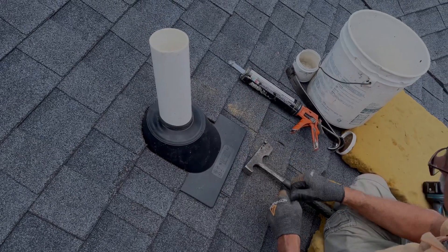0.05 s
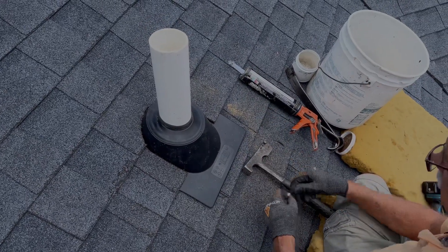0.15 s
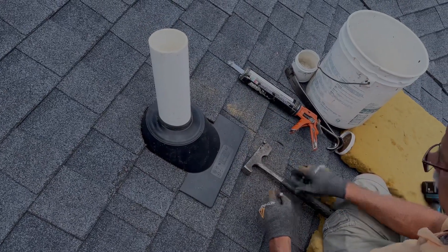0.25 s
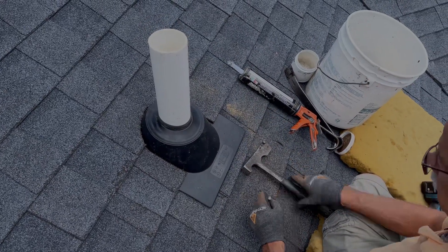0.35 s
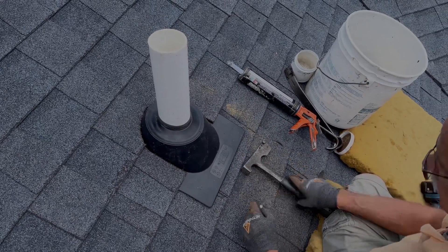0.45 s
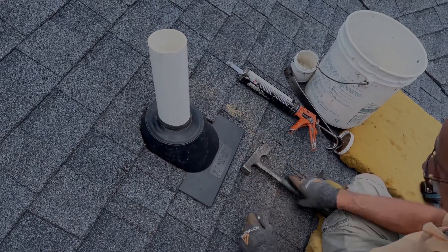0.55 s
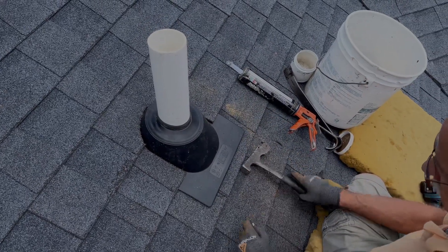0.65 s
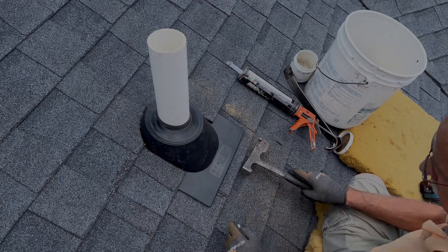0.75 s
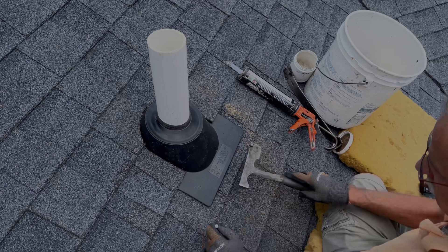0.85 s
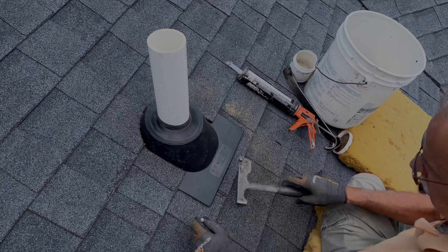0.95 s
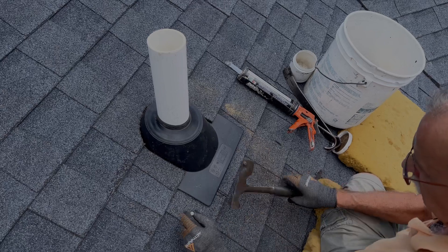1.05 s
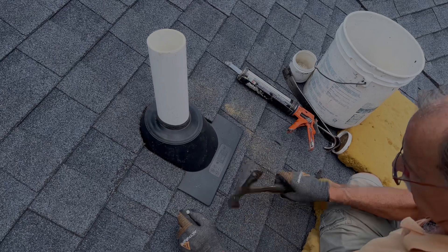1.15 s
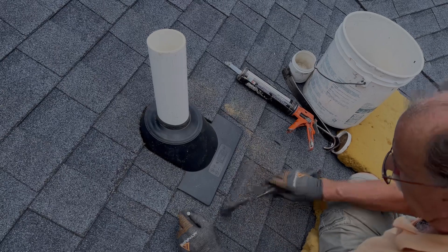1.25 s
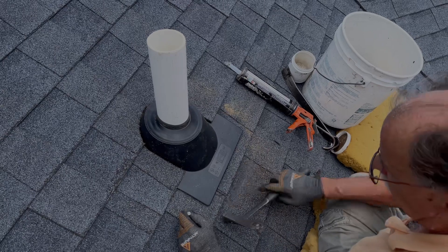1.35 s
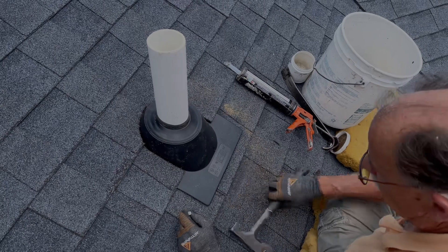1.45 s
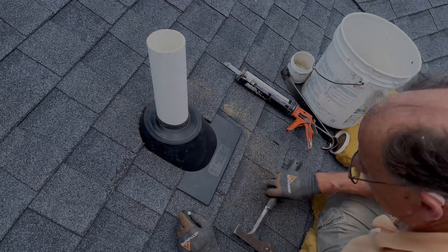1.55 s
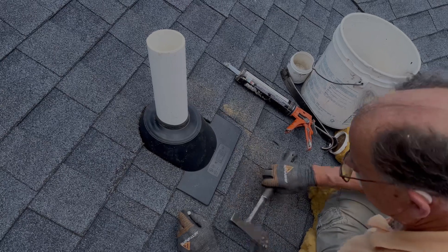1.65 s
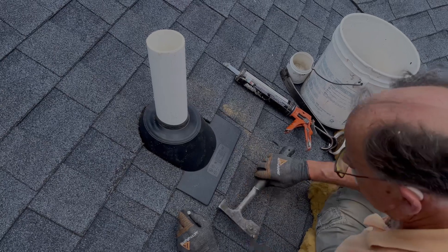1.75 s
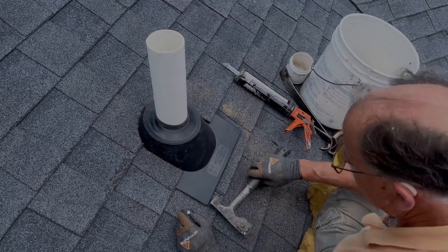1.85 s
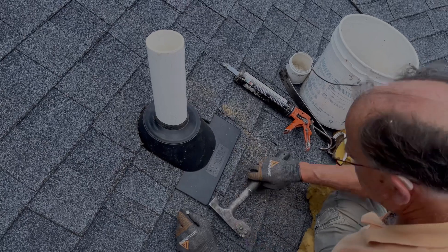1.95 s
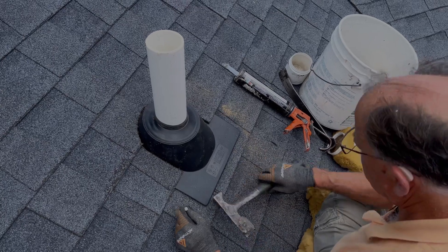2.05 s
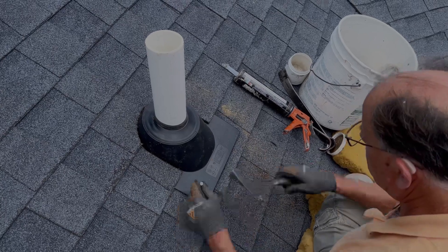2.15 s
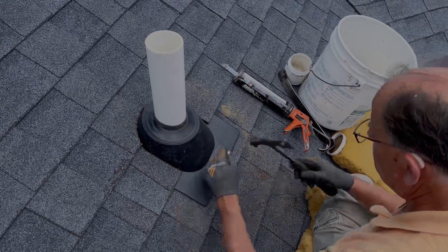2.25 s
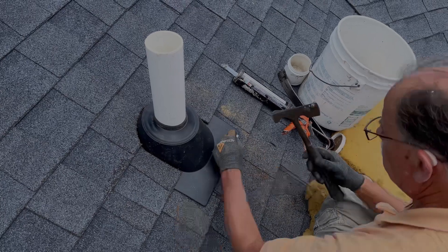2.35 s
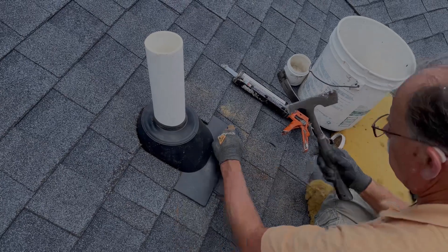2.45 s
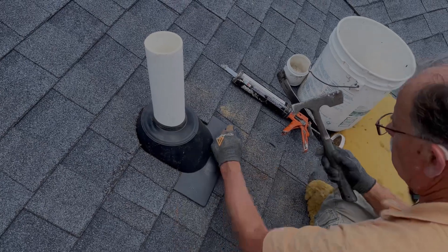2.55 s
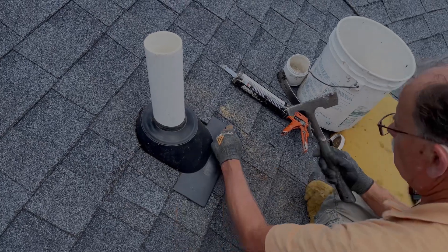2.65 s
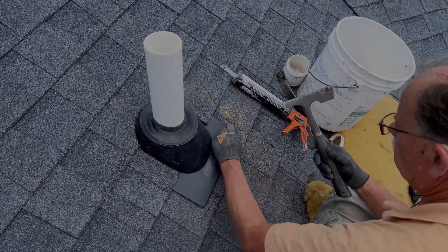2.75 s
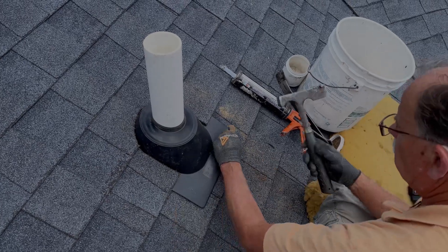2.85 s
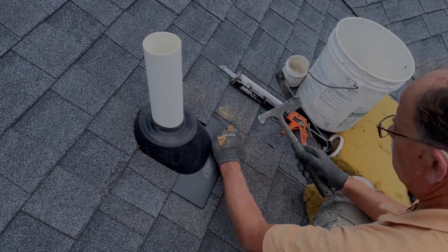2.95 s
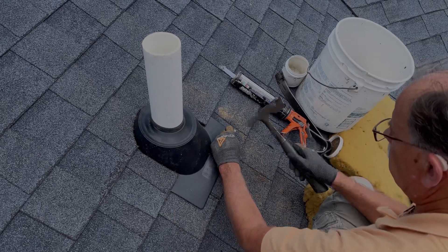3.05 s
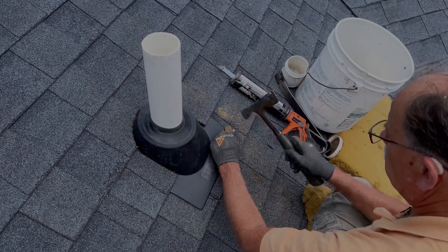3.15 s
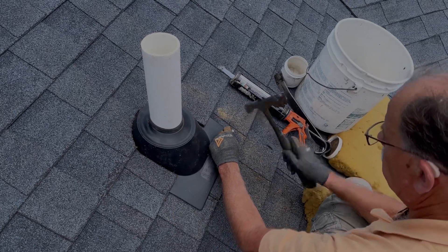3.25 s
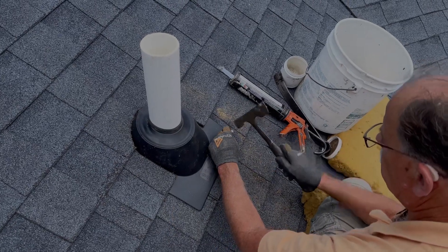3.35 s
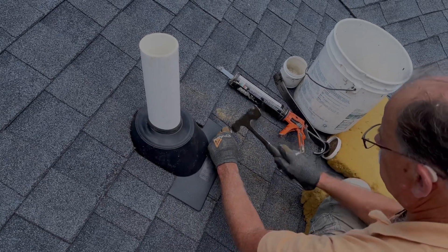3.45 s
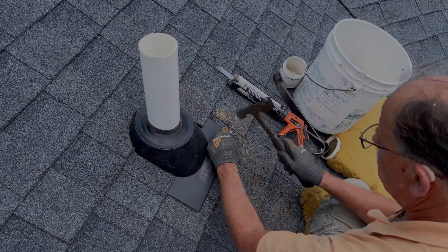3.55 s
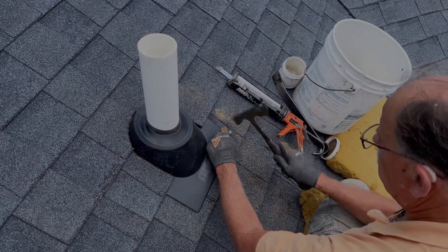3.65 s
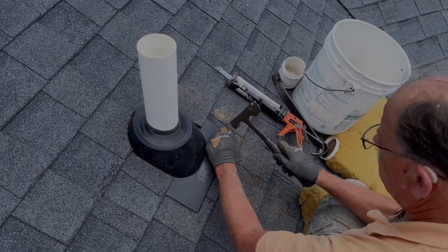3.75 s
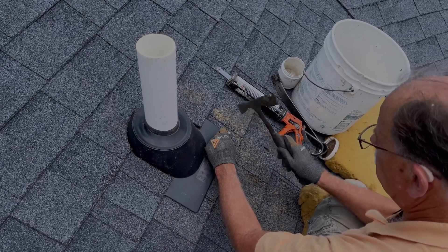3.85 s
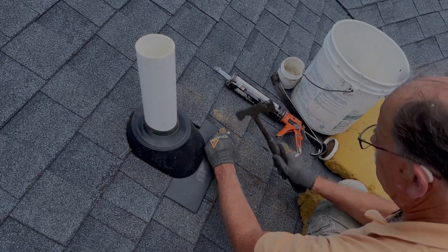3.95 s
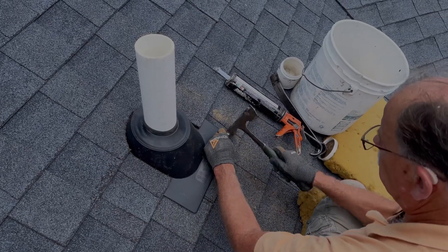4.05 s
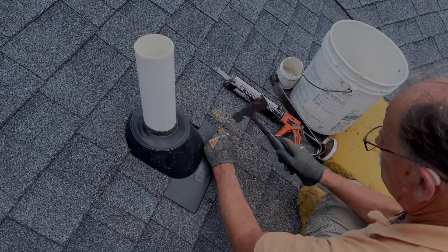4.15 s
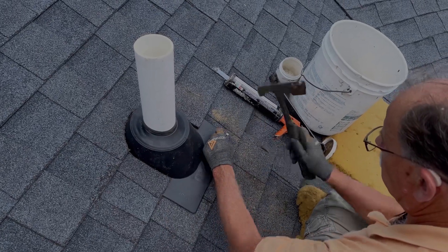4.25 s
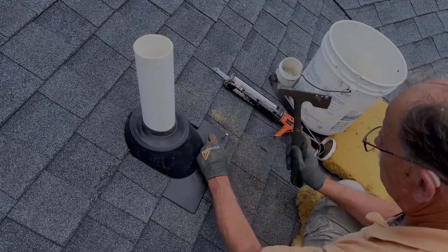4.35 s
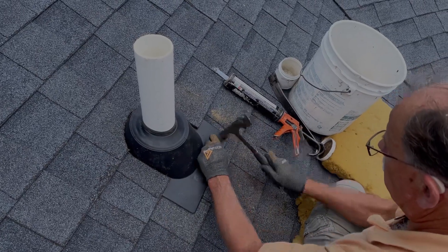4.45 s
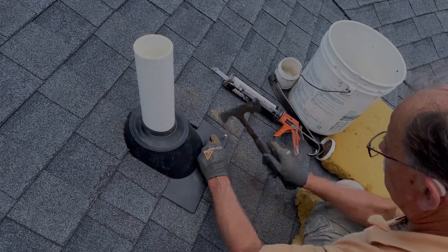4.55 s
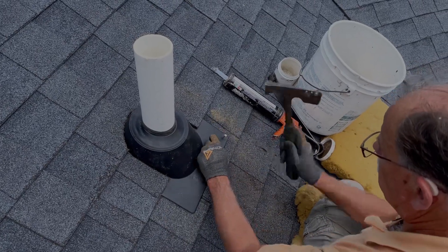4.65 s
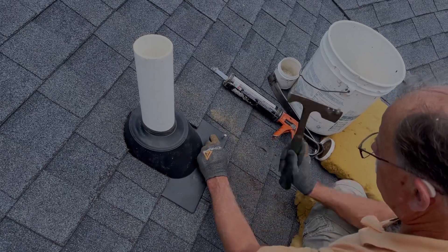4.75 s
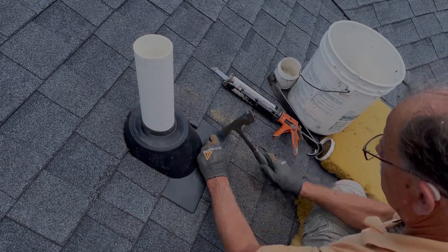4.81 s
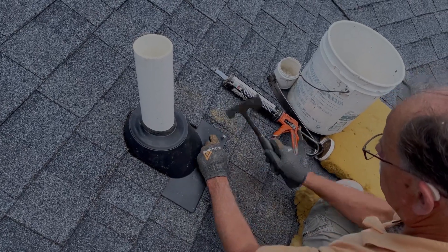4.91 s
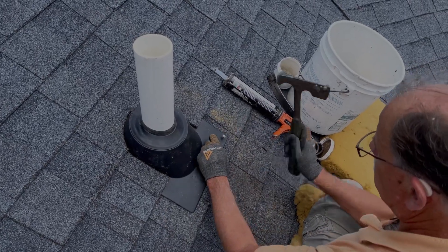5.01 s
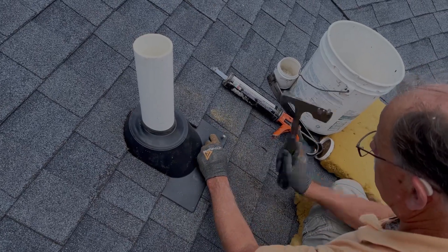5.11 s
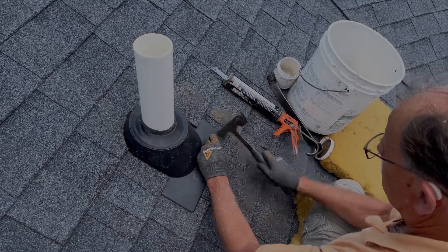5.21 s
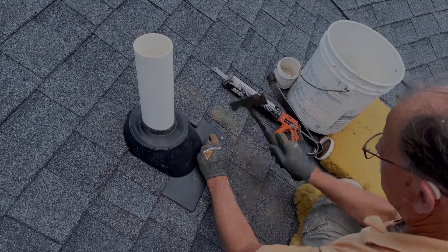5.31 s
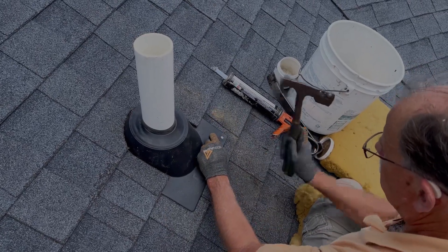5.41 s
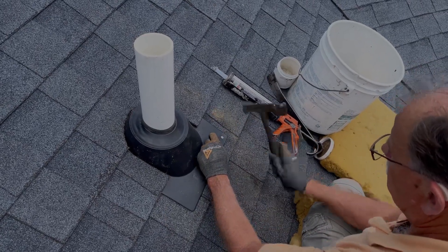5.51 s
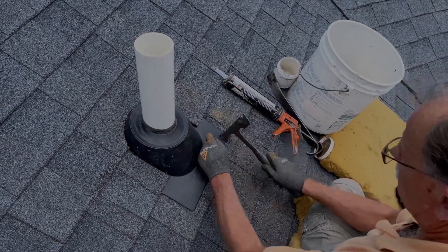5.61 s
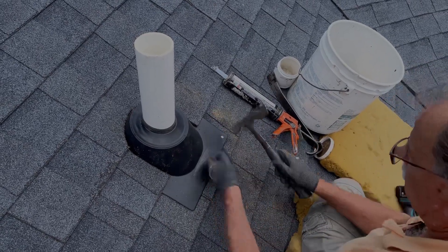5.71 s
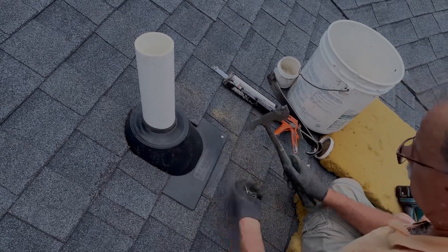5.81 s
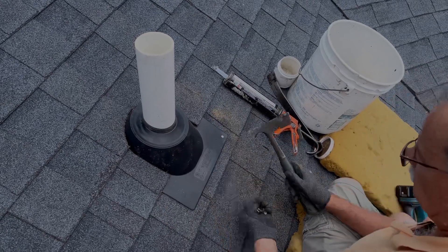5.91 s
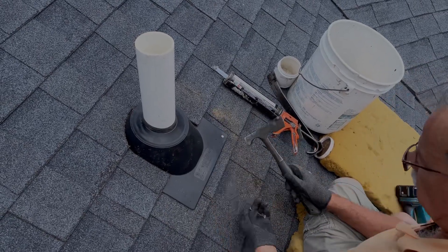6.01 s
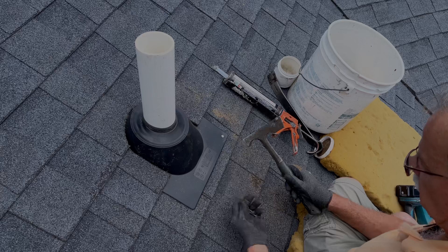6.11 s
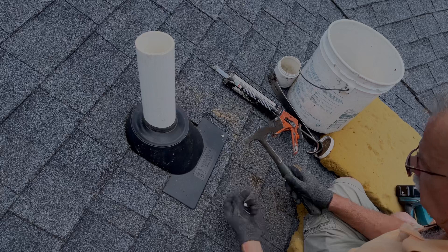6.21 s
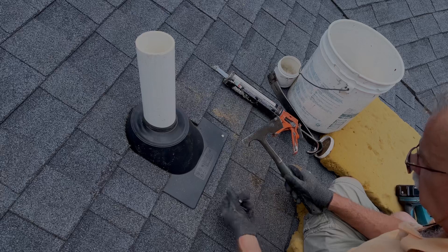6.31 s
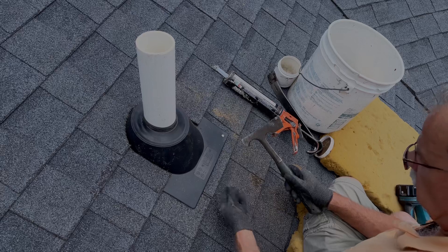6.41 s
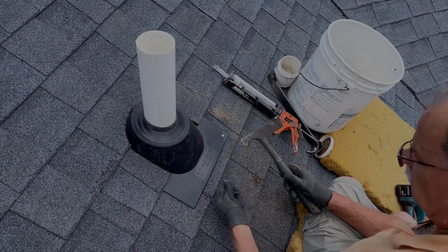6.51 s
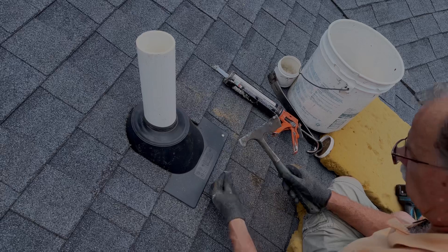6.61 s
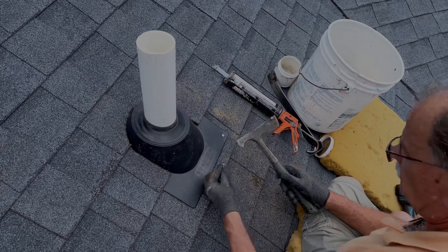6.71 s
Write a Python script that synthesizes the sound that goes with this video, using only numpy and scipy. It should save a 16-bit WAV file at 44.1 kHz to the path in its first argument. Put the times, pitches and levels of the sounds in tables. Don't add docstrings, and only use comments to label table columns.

```python
import sys
import numpy as np
from scipy import signal
from scipy.fft import rfft, irfft
from scipy.io import wavfile
from scipy.ndimage import uniform_filter1d, minimum_filter1d

SR = 44100
rng = np.random.default_rng(int(sys.argv[2]) if len(sys.argv) > 2 else 0)


def pcm_store(signal):
    levels = np.round(np.clip(np.atleast_2d(signal), -1, 1) * 32767)
    wavfile.write(sys.argv[1], SR, levels.astype(np.int16).T)


def makeup_ratio(level_db):
    decades = np.asarray(level_db, float) / 20
    return 10 ** decades


N = 298549

UNEVEN_DB = 1.5


def coloured(spectrum):
    hz, db = np.transpose(spectrum)
    bins_hz = np.fft.rfftfreq(N, 1 / SR) + 1
    bins_db = np.interp(np.log(bins_hz), np.log(hz), db, left=-90, right=-90)
    x = irfft(rfft(rng.standard_normal(N)) * makeup_ratio(bins_db), N)
    return x / np.std(x)


def drift(rate):
    knots = rng.standard_normal(400)
    return np.interp(np.arange(N) / SR * rate, np.arange(400), knots)


def swells(rows):
    t = np.arange(N) / SR
    return sum(makeup_ratio(db) * np.exp(-((t - s) / half) ** 2) for s, half, db in rows)


def add(out, s, sound):
    i = round(s * SR)
    out[i:i + len(sound)] += sound[:N - i]


def fade(t, t60):
    return makeup_ratio(-60 * t / t60)


def struck(modes, t, slower, spread_db):
    luck = rng.standard_normal((len(modes), 2))
    ring = 0
    for (hz, db, t60), (strength, detune) in zip(modes, luck):
        tone = np.sin(2 * np.pi * hz * (1 + detune / 200) * t)
        ring = ring + makeup_ratio(db + spread_db * strength) * tone * fade(t, t60 * slower)
    return ring


def band(x, low_hz, high_hz):
    return signal.sosfilt(signal.butter(2, [low_hz, min(high_hz, .45 * SR)], "band", fs=SR, output="sos"), x)


def steel():
    # t/s, peak level/dB, overtone share/dB, grit share/dB, decay factor
    blow_rows = [(1.2937, -32.5, 10, 1, 0.58), (1.439, -39, -3, 9, 0.78), (1.4869, -22.5, -26, -9.5, 0.61),
                 (1.8064, -25.5, 2.5, -5, 0.3), (1.821, -27.5, 0, -20, 0.32), (3.3929, -20.5, 1, -15, 1),
                 (3.4043, -32.5, -1, -30, 0.51), (3.687, -18.5, 3.5, -16, 0.86),
                 (3.9889, -15.5, -2, -6, 0.91), (4.4534, -18, 0.5, -9, 1), (4.8255, -26, 9.5, -2, 0.75),
                 (5.1761, -21, 1.5, -1.5, 0.97), (5.5641, -17.5, -25, -8.5, 0.74),
                 (1.4803, -39, -5, -1, 0.95)]
    # f/Hz, level/dB, t60/s
    nail_modes = [(2147, -2, 0.011), (2540, 2.5, 0.0057), (2877, 12.5, 0.0084), (3440, -6, 0.033)]
    high_modes = [(4610, -11.5, 0.014), (4805, 2.5, 0.0067), (5200, -1, 0.0073)]
    pitch = 0.95
    out, t = np.zeros(N), np.arange(4000) / SR
    contact = 1 - np.exp(-(t / 0.00032) ** 2)
    for s, db, high_db, grit_db, slower in blow_rows:
        slower = max(slower, .2)
        noise = rng.standard_normal((3, len(t)))
        quick_chatter = fade(t, 0.014 * slower)
        slow_chatter = makeup_ratio(-12.5) * fade(t, 0.034 * slower) + makeup_ratio(-44) * fade(t, 0.24)
        chatter = makeup_ratio(5.5) * (quick_chatter + slow_chatter)
        low_rasp = band(band(noise[0], 1800 * pitch, 3700 * pitch), 1800 * pitch, 3700 * pitch)
        high_rasp = makeup_ratio(-3.5) * band(band(noise[1], 4230, 6070), 4230, 6070)
        nail = makeup_ratio(-8.5) * struck(nail_modes, pitch * t, slower, UNEVEN_DB) + chatter * low_rasp
        high = makeup_ratio(-4) * struck(high_modes, t, slower, UNEVEN_DB) + chatter * high_rasp
        hiss = band(noise[2], 3700, 13400)
        grit = hiss * makeup_ratio(1.5) * fade(t, 0.0081)
        grit = grit + band(hiss, 3300, 10900) * makeup_ratio(-8.5) * fade(t, 0.031 * slower)
        add(out, s, makeup_ratio(db) * contact * (nail + makeup_ratio(high_db) * high + makeup_ratio(grit_db) * grit))
    return out


def flashing():
    # t/s, peak level/dB, high ring f/Hz, high share/dB
    slap_rows = [(1.295, -34, 1510, -7), (1.44, -29, 1030, -12.5), (1.487, -27.5, 1410, -13),
                 (1.807, -34.5, 817, -0.5), (1.82, -37, 1000, -8), (3.391, -68, 1560, -10),
                 (3.687, -38, 890, 6.5), (3.989, -17, 1436, -7.5), (4.456, -17.5, 1010, -10),
                 (4.825, -18.5, 1143, -7), (5.175, -21.5, 897, -1), (5.564, -24.5, 1430, -5.5)]
    sheet_hz, t60 = 498, 0.033
    out, t = np.zeros(N), np.arange(4000) / SR
    contact = 1 - np.exp(-(t / 0.0018) ** 2)
    for s, db, high_hz, high_db in slap_rows:
        rings = struck([(sheet_hz, -3, t60), (high_hz, high_db - 0.5, t60)], t, 0.91, UNEVEN_DB)
        scrunch = makeup_ratio(high_db + 14.5) * band(rng.standard_normal(len(t)), 580, 2180) * fade(t, 1.15 * t60)
        add(out, s, makeup_ratio(db) * (rings + scrunch) * contact)
    return out


def deck():
    # t/s, level/dB, arrival of the slow crest/ms, give of the contact (0-1), late echo level/dB
    wave_rows = [(1.294, -29, 16, 0.44, -83), (1.4406, -37.5, 18.7, 0.4, -88),
                 (1.487, -40, 12.7, 0.36, -90), (1.8065, -35.5, 15.8, 0.07, -74.5),
                 (1.821, -40.5, 17, 0.1, -77), (3.3929, -36, 18.9, 0.74, -84),
                 (3.6875, -25.5, 16.5, 1.03, -92), (3.99, -20, 15.8, 0.55, -65),
                 (4.454, -20.5, 14.6, 0.19, -71), (4.8256, -21, 16, 0, -63.5), (5.175, -24, 16.8, 0.4, -60),
                 (5.1783, -19.5, 6.9, 0.03, -92), (5.2189, -32.5, 6.1, 0.58, -100),
                 (5.2284, -36.5, 6.3, 0.7, -101), (2.61, -56, 8.9, 0, -100), (5.564, -14.5, 7, 0.08, -60),
                 (5.6135, -37.5, 7.9, 0, -88)]
    # f/Hz, level/dB, t60/s
    rafter_modes = [(31, -27, 0.46), (50.2, -19, 0.63), (63.6, -18.5, 0.58), (160.5, -25.5, 0.49),
                    (211, -31, 0.11)]
    # f/Hz, level/dB per Hz
    echo_colour = [(71, -43), (120, -12), (161, -4), (217, -18.5), (430, -12), (1010, -26), (3170, -30),
                   (10000, -49.5), (13000, -70), (22000, -120)]
    driving_from_s = 3.3
    (out, low, tail, echo), t = np.zeros((4, N)), (np.arange(SR) + 1) / SR
    boom = sum(makeup_ratio(db) * np.sin(2 * np.pi * hz * t) * fade(t, t60) for hz, db, t60 in rafter_modes)
    boom = boom * (1 - fade(t, 0.18))
    answer = 2 * (t / .1) ** 2 * np.exp(-t / .1)
    start = 1 - np.exp(-(t / .003) ** 2)
    for s, db, crest_ms, give, echo_db in wave_rows:
        if s > driving_from_s:
            fade_ms, gap_hz = crest_ms * 0.95 + 2.57, 314 - 55 * (s - driving_from_s)
        else:
            fade_ms, gap_hz = crest_ms * 1.34 + 2.57, 161
        tail_db = -12 - 10.5 * give + (0.73 - 1) * (db + 23.5)
        boom_db = 1.6 + (0.84 - 1) * (db + 18.5) + 1.1 * (crest_ms - 16)
        age = 1000 * t / crest_ms
        turns = 1.22 * np.log(age) + .23 * (age - 1)
        sweep = np.cos(2 * np.pi * turns) * start * age ** give * np.exp(-(1000 * t / fade_ms) ** 2.3)
        reflected = signal.lfilter(*signal.iirpeak(gap_hz, 3.0, SR), sweep)
        sweep = sweep - np.clip(0.49 + give, 0, 1) * reflected
        add(out, s, makeup_ratio(db + 7) * sweep)
        add(low, s, makeup_ratio(db + boom_db) * boom)
        add(tail, s, makeup_ratio(db + tail_db) * start * fade(t, 0.14))
        add(echo, s, makeup_ratio(echo_db) * answer)
    scattered = band(rng.standard_normal(N), 100, 528)
    scattered = scattered / np.std(scattered)
    waver = drift(25)
    walls = echo * coloured(echo_colour) * makeup_ratio(2.0 * waver)
    return out + low * makeup_ratio(2.5 * waver) + tail * scattered + walls


def ticks():
    # t/s, peak level/dB, f/Hz, grit share/dB
    tick_rows = [(0.637, -44, 1650, -21), (1.8314, -50, 4100, -23), (2.4326, -36, 1660, -30),
                 (2.4534, -49, 1560, -19), (2.5875, -43, 2030, -36), (2.5958, -40.5, 1960, -46),
                 (2.611, -29, 1970, -61), (2.6853, -43, 2040, -43), (2.9554, -41.5, 2130, -48),
                 (3.0013, -49, 1970, -28), (3.4344, -59, 3270, -22), (3.442, -48, 2290, -21),
                 (3.7394, -51, 2360, -26), (4.0412, -47, 2280, -8), (4.0627, -46.5, 1860, -2),
                 (4.0813, -44.5, 2880, -8), (4.2373, -44.5, 1570, -20), (4.2516, -49.5, 3030, -30),
                 (4.3914, -42, 2190, -31), (4.506, -47.5, 1840, -11), (4.703, -50.5, 3940, -31),
                 (4.8778, -44.5, 1310, -10), (5.1253, -48, 1500, -9), (5.1974, -43.5, 1680, 0.5),
                 (5.609, -44, 1430, -6.5), (6.6714, -72, 3000, -9), (6.7094, -70, 2300, -9),
                 (6.7254, -70, 1590, -9), (2.0165, -40, 670, -33), (5.231, -34.5, 646, -22)]
    out, t = np.zeros(N), np.arange(2000) / SR
    for s, db, hz, grit_db in tick_rows:
        ring_db = -10.5 - 0.27 * grit_db
        t60 = max(0.027 + 0.0003 * grit_db, .008) * (1900 / hz) ** 0.29
        noise = rng.standard_normal((2, len(t)))
        ring = struck([(hz, ring_db, t60), (4700, -20, t60)], t, 0.95, UNEVEN_DB)
        scratch = makeup_ratio(5.0) * band(noise[0], .65 * hz, 1.9 * hz) * fade(t, 0.88 * t60)
        snap = band(noise[1], 3600, 9700) * fade(t, t60)
        add(out, s, makeup_ratio(db) * (1 - fade(t, 0.0045)) * (ring + scratch + makeup_ratio(grit_db) * snap))
    return out


def granules():
    # t/s, peak level/dB
    granule_rows = [(4.4774, -50), (4.6568, -63), (4.8474, -51), (4.8656, -61), (4.9846, -61), (5.034, -59),
                    (5.1253, -60), (5.3867, -60), (5.429, -69), (5.4939, -64), (5.5343, -63), (5.6164, -62),
                    (6.6717, -66), (6.7096, -67), (6.7256, -65)]
    out, t = np.zeros(N), np.arange(600) / SR
    for s, db in granule_rows:
        noise = rng.standard_normal(len(t)) * fade(t, 0.005)
        add(out, s, makeup_ratio(db + 5.5) * band(noise, 3300, 12400))
    return out


def jingle():
    # t/s, peak level/dB, f/Hz
    touch_rows = [(5.7458, -76, 11900), (5.8064, -52, 11900), (5.8144, -57, 12400), (5.8406, -59, 12500),
                  (5.9065, -64, 12700), (5.966, -73, 12400), (5.985, -69, 12400), (6.0741, -49.5, 12600),
                  (6.0894, -58, 12100), (6.1094, -65, 12200), (6.1769, -57, 12600), (6.1944, -62, 12300),
                  (6.3235, -68, 12200), (6.4744, -74, 11900), (6.5181, -71, 12200)]
    t60 = 0.049
    out, t = np.zeros(N), np.arange(6000) / SR
    for s, db, hz in touch_rows:
        snap_db = -75 + 0.4 * (db + 65) - db
        ring = struck([(hz, -3, t60), (12080, -20, .09), (0.88 * hz, -10, 0.54 * t60)], t, 1, UNEVEN_DB)
        snap = band(rng.standard_normal(len(t)), 6500, 12500) * fade(t, .008)
        add(out, s, makeup_ratio(db) * (1 - fade(t, 0.0033)) * (ring + makeup_ratio(snap_db + 14) * snap))
    return out


def rustle():
    # middle t/s, half length/s, level/dB
    stroke_rows = [(0.426, .02, -75), (0.642, 0.048, -64), (0.787, 0.046, -73), (1.082, 0.05, -65.5),
                   (1.848, 0.025, -65), (2.04, 0.012, -65), (2.377, 0.19, -72), (2.633, 0.031, -71),
                   (2.94, 0.035, -71), (4.253, 0.013, -65), (4.686, 0.069, -70), (5.046, 0.068, -68.5),
                   (5.35, 0.16, -66.5), (5.763, 0.046, -67), (6.03, .02, -72)]
    # f/Hz, level/dB per Hz
    cloth_colour = [(500, -28), (1000, 0), (2000, -5), (3500, -2), (7000, -18), (11000, -29.5),
                    (16000, -48)]
    grains = makeup_ratio(4.2 * np.minimum(rng.exponential(1, N), 4))
    cloth = band(coloured(cloth_colour) * grains, 600, 12300)
    return swells(stroke_rows) * cloth / np.std(cloth)


def rumble():
    # middle t/s, half length/s, level/dB
    shift_rows = [
        (0.24, 0.097, -56.5),
        (0.68, 0.032, -58),
        (1.7, 0.34, -71),
        (2.5, 0.26, -74),
        (4.7, 0.77, -62),
        (5.95, 0.018, -58.5),
        (6.76, 0.16, -66.5),
    ]
    low = band(rng.standard_normal(N), 47.3, 113.6)
    level = makeup_ratio(-67) + swells(shift_rows)
    return level * makeup_ratio(2 * drift(24)) * low / np.std(low)


def town():
    # f/Hz, level/dB per Hz
    town_colour = [(24, -48), (44, -10), (60, -23), (100, -5.5), (160, -14.5), (280, -5), (450, -11.5),
                   (1000, -14), (2500, -17.5), (4500, -21), (8000, -29.5), (12000, -37), (14800, -43),
                   (15800, -75)]
    # t/s, level/dB
    level_rows = [(0, -63), (3, -64), (5, -65.5), (5.8, -70), (6.3, -67), (6.77, -68)]
    level_s, level_db = np.transpose(level_rows)
    town_db = np.interp(np.arange(N) / SR, level_s, level_db)
    return makeup_ratio(town_db + .6 * drift(30)) * coloured(town_colour)


def scene():
    blows = steel() + flashing() + deck()
    small_sounds = ticks() + granules() + jingle()
    background = rustle() + rumble() + town()
    return (blows + small_sounds + background)[None]


def band_limit(x):
    return signal.sosfilt(signal.butter(12, 16800, fs=SR, output="sos"), x)


def record(dry):
    t = np.arange(N) / SR
    over_db = np.maximum(20 * np.log10(np.abs(dry) / .185 + 1e-9), 0)
    held_db = np.maximum.accumulate(over_db + 900 * t, axis=1) - 900 * t
    ahead_db = -minimum_filter1d(-held_db, size=17, axis=1)
    limited = dry * makeup_ratio(-uniform_filter1d(ahead_db, size=17, axis=1))
    microphone = signal.butter(10, 16300, fs=SR, output="sos")
    mix = signal.sosfilt(microphone, limited)
    return band_limit(mix)


dry = scene()
out = record(dry)
pcm_store(out)
```